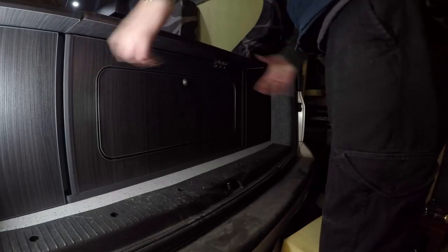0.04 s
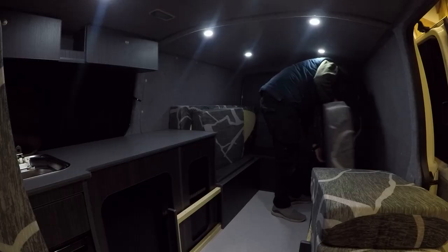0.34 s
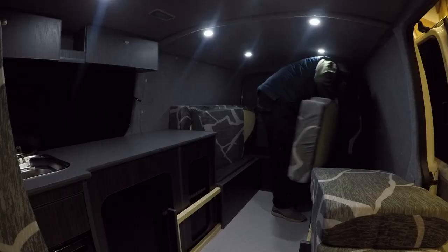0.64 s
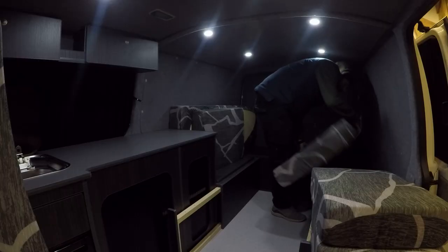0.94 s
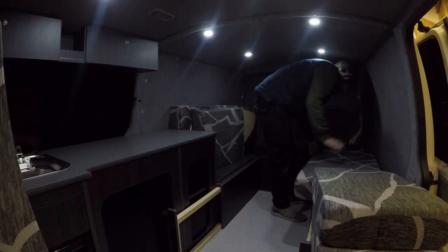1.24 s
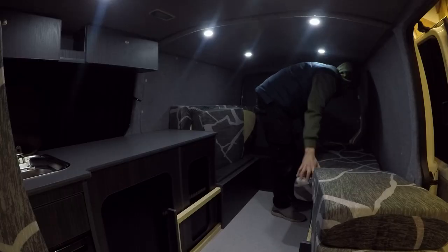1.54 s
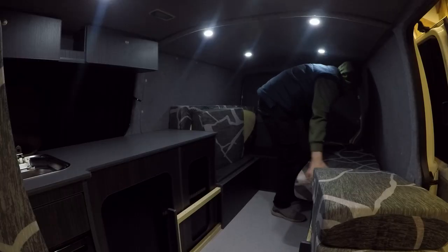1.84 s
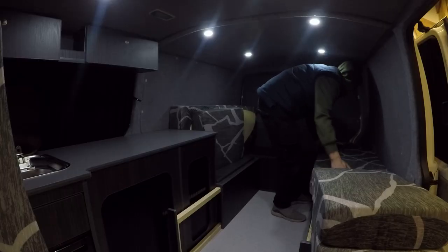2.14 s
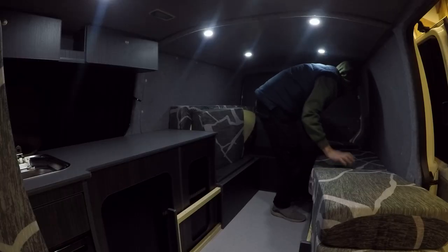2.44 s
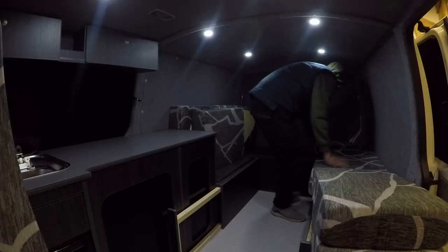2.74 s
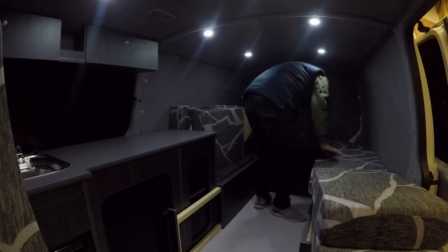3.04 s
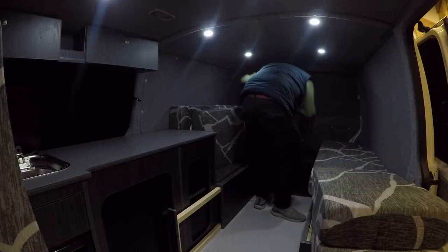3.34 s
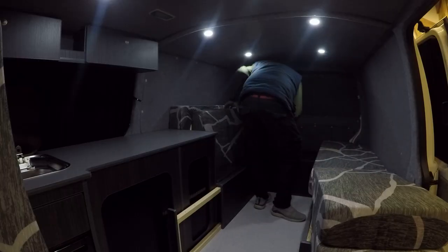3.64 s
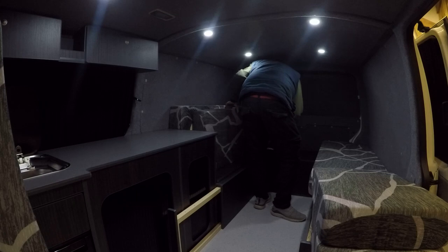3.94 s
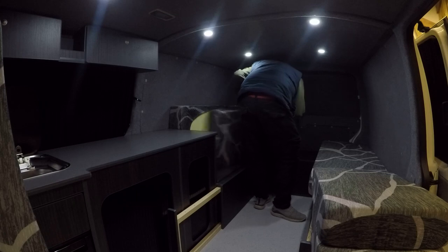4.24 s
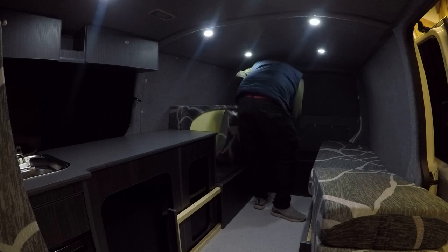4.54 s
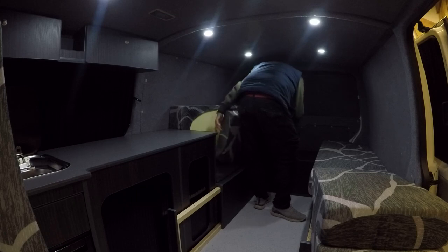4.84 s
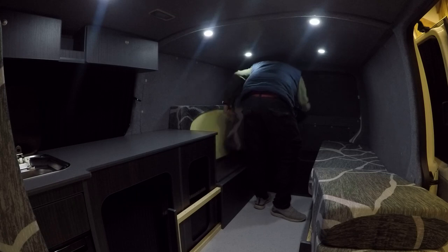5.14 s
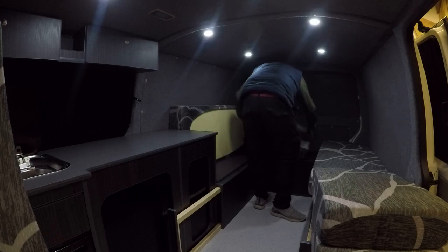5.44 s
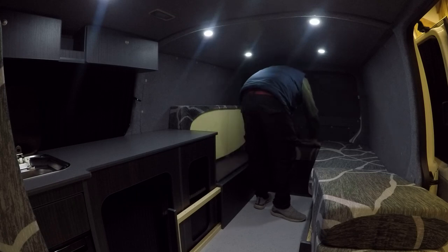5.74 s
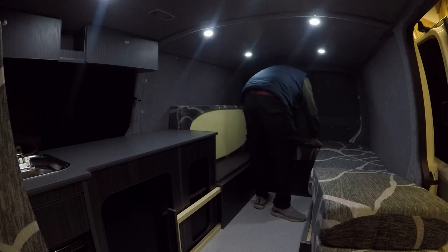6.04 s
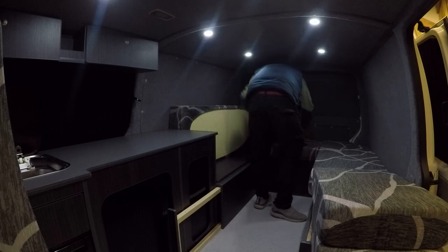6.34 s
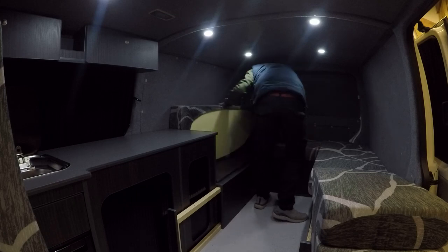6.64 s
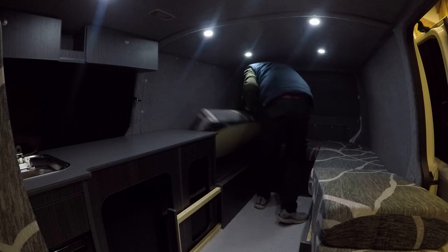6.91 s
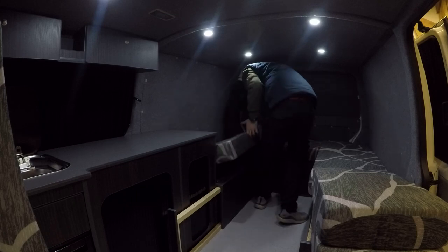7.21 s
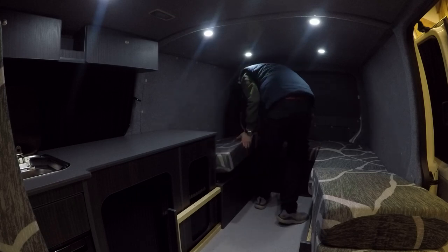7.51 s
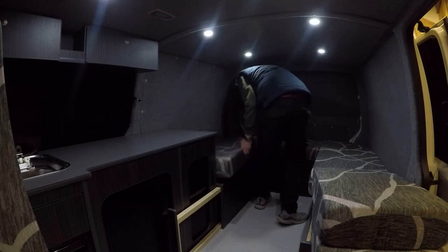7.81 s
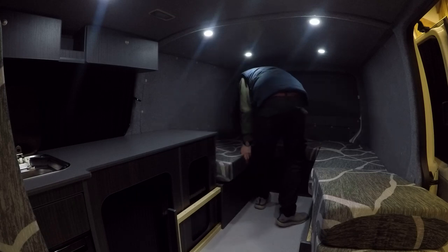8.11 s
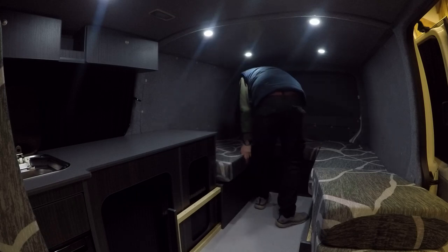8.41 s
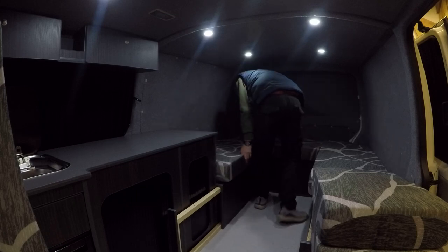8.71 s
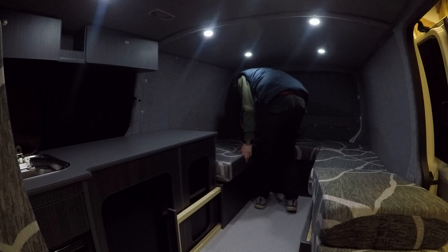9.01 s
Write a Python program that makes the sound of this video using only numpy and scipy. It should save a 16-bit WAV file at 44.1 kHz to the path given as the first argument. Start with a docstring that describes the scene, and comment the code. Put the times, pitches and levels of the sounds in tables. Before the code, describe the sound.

Faint hiss, low rumble and soft shuffling steps fill a carpeted van, heard close through one microphone. At about 1.1 seconds a board-backed foam cushion lands on a plywood bench box: a thump, a quick panel rattle and a cloth slap, after which the van booms and rocks. Pats, nudges and rubbing fabric follow from 2 to 3 seconds, with a light knock near 4.2. At 5.5 seconds comes a heavier drop, with a hollow wooden clack and another fading boom. Covers slide softly from about 6.3 to 8 seconds, one creaking very faintly at 7, and a few low, muffled pushes follow. Near 8.6 seconds a cushion lands on a second box with a higher-pitched knock. Another bump comes at 8.9 and a small tap just after. The cabin's echo is very short.

```python
"""Inside a carpeted van, one microphone close to two plywood bench boxes. Faint hiss, rumble and soft steps.
At 1.1 s a board-backed foam cushion lands: the box thumps, its panels rattle, the cloth cover slaps,
and the van booms and rocks after it. Pats, nudges and rubbing fabric lead to a heavier drop at 5.5 s.
Covers slide, one creaks faintly at 7 s, and near 8.6 s a cushion lands on the higher-pitched left box."""
import sys
import numpy as np
from scipy import signal
from scipy.fft import rfft, irfft, next_fast_len
from scipy.io import wavfile
from scipy.ndimage import map_coordinates

SR = 44100
rng = np.random.default_rng(int(sys.argv[2]) if len(sys.argv) > 2 else 0)


def digitize_waveform(pressure):
    """Quantize a signal to 16-bit integers and store it at the path in sys.argv[1].

    Rows of a 2-D input are taken as channels; values are limited to [-1, 1].
    """
    field = np.atleast_2d(pressure).T
    bounded = np.clip(field, -1, 1)
    quanta = np.round(bounded * 32767).astype(np.int16)
    wavfile.write(sys.argv[1], SR, quanta)


N = 399987

# Spectra of the hiss, the rumble on the springs and rubbing cloth: f/Hz, relative level/dB
HISS_SPECTRUM = [(20, -14), (100, 5.5), (250, 1.5), (600, -3.5), (1500, -8), (4000, -12.5), (6500, -13.5),
                 (10000, -15), (15000, -16.5)]
RUMBLE_SPECTRUM = [(8, 3), (20, 9), (32, 6.5), (50, -9), (80, -18.5), (105, -14.5), (150, -36),
                   (400, -45.5), (1000, -80)]
CLOTH_SPECTRUM = [(150, 4), (450, -3.5), (800, 1), (1500, -2), (2800, -3), (4500, -2.5), (5600, -13.5),
                  (7000, -17), (9500, -14.5), (12500, -24), (15000, -31)]
# Cloth sliding on cloth: t/s of fastest motion, swell time/s, level/dB, treble tilt/(dB per octave)
CLOTH_STROKES = [ (1.003, 0.067, -71, -.5), (2.08, 0.23, -65.5, -3), (2.651, 0.037, -59.5, 2.5),
                 (3.199, 0.44, -74.5, 0), (4.002, 0.18, -77, 2), (4.313, .05, -71, 4), (4.451, .05, -71, 2),
                 (6.288, 0.099, -68, .5), (6.679, 0.16, -60, 0.5), (6.749, .05, -62.5, 2),
                 (6.84, .05, -65.5, 0), (6.978, 0.15, -69.5, .5), (7.446, 0.26, -70, -1),
                 (7.783, 0.071, -65.5, -2.5), (8.093, 0.098, -62, -3)]
# Soft steps, nudges and air pushed by a falling cushion: t/s, thump level/dB, thump f/Hz
SOFT_PUSHES = [ (0.251, -59.5, 97), (0.33, -61.5, 102), (2.06, -43.5, 72.4), (2.077, -36.5, 33),
               (2.248, -46, 46), (2.599, -44.5, 46), (2.785, -47, 96.5), (2.852, -44.5, 55),
               (3.754, -54.5, 63.5), (4.296, -54, 88), (4.365, -45.5, 25), (4.735, -59, 79),
               (4.942, -51.5, 63.4), (5.486, -49.5, 55.3), (5.544, -34.5, 27.8), (5.746, -44.5, 84.3),
               (6.572, -48, 61.5), (7.30, -34, 40), (7.43, -40, 62), (7.564, -41.5, 70), (7.868, -51, 93),
               (8.053, -42.5, 45), (8.425, -46.5, 45), (8.587, -24.5, 31.7), (8.657, -41, 48.3),
               (8.913, -35, 36.3)]
# Modes of the plywood panels: f/Hz, relative level/dB, t60/s
PANEL_MODES = [(159, -1, 0.14), (186.3, 4, 0.12), (227.3, -9, 0.11), (263.8, -7.5, 0.16), (316, -5, 0.083),
               (384, -5, 0.075), (467, -7.5, 0.088), (559, -6.5, 0.082), (710, -4.5, 0.053),
               (850, -7.5, 0.062), (937, -14, 0.057), (1039, -17, 0.084), (1333, -18, 0.088),
               (1492, -11, 0.04), (1990, -30, 0.044), (3225, -16.5, 0.078), (4570, -12, 0.02)]
# Spectrum of the panels' dense ring: f/Hz, relative level/dB
RING_SPECTRUM = [(100, 18.5), (300, 5.5), (600, 5.5), (1300, -10), (2200, -6), (4500, -15.5), (5600, -32),
                 (10000, -35.5), (15000, -48)]
# Decay of that ring: f/Hz, t60/s
RING_DECAY = [(150, 0.11), (500, 0.1), (1500, 0.085), (5000, 0.096), (12000, 0.064)]
# Modes of the van body and the air inside: f/Hz, relative level/dB, t60/s
VAN_MODES = [(29.55, -10, 0.67), (38.7, -13.5, 0.14), (64.8, -32, 0.8), (98.4, -20.5, 0.45),
             (102.7, -32, 0.93)]
# Reverberation of the cabin: f/Hz, t60/s
CABIN_DECAY = [(150, 0.45), (500, 0.4), (2000, 0.31), (8000, 0.24)]
# Blows of cushions, boards and hands; a dropped cushion lands edge first, then flat, then rebounds:
# t/s, thump level/dB, thump f/Hz, hollow knock level/dB, wooden clack level/dB, clack f/Hz,
# cloth slap level/dB, contact time/s
CUSHION_BLOWS = [ (1.123, -34.5, 58.5, -42, -48, 900, -60, 0.013),
                 (1.142, -30, 60.7, -45, -40, 1400, -42, 0.0044),
                 (1.149, -29, 140, -29, -35.5, 1400, -60, 0.0049),
                 (1.173, -32, 65, -31.5, -49, 645, -66, .004),
                 (1.193, -25.5, 102, -37.5, -53, 750, -76, 0.0092),
                 (1.263, -31, 60, -65, -68, 1500, -62.5, 0.0026),
                 (2.127, -32.5, 134, -34.5, -39, 500, -70, 0.0041),
                 (2.477, -41.5, 132, -42, -50.5, 1250, -65, 0.0071),
                 (2.520, -47, 71, -60, -54.5, 1490, -53, .0015),
                 (2.733, -45.5, 120, -45.5, -55, 600, -71, 0.0068),
                 (2.967, -64, 80, -56, -56.5, 840, -71, 0.0015),
                 (3.030, -80, 120, -61.5, -57.5, 790, -54, 0.00059),
                 (4.214, -49.5, 129, -48.5, -45.5, 890, -58, 0.002),
                 (5.517, -34, 56.4, -38.5, -52.5, 910, -66, 0.0085),
                 (5.547, -20.5, 78.5, -27, -39, 1200, -45.5, 0.0014),
                 (5.565, -19, 85.5, -23, -35.5, 1040, -49, 0.0034),
                 (5.579, -33, 96, -30.5, -35.5, 1290, -45.5, 0.002),
                 (5.600, -29.5, 50, -50, -46.5, 790, -61, 0.0039),
                 (8.113, -41, 54.3, -45, -57.5, 1210, -81, 0.0028),
                 (8.579, -22, 77, -40.5, -45, 930, -56.5, 0.0099),
                 (8.604, -25.5, 76.3, -26, -40.5, 1230, -56, 0.0028),
                 (8.624, -38, 107, -34.5, -55, 1010, -52.5, 0.00042),
                 (8.909, -28, 79.5, -36, -46, 1110, -63, 0.0039),
                 (9.05, -50, 61, -49, -58, 920, -67.5, .002)]

TOP_HZ = 15350  # upper limit of the microphone channel
RING_T = np.arange(SR * 3 // 5) / SR  # time axis of one impact, t/s
BURST_SAMPLES = .02 * SR


def amp(db):
    """Decibels to gain."""
    return 10 ** (np.asarray(db) / 20)


def unit(x):
    """Scale to rms 1."""
    return x / np.sqrt(np.mean(x ** 2) + 1e-20)


def burst(x):
    """Scale a short sound to the energy of 20 ms at rms 1."""
    return x / np.sqrt(np.sum(x ** 2) / BURST_SAMPLES + 1e-20)


def along(points, hz):
    """Interpolate (f/Hz, value) points on a log frequency axis."""
    f, values = np.transpose(points)
    return np.interp(np.log(hz + 1), np.log(f + 1), values)


def wobble(knots_per_s):
    """A smooth random curve as long as the scene."""
    knots = rng.standard_normal(int(N * knots_per_s / SR) + 4)
    return map_coordinates(knots, [np.arange(N) * knots_per_s / SR])


def filtered(x, response):
    """Weight the spectrum of x by the gain response(hz)."""
    size = next_fast_len(len(x) + SR // 5)
    return irfft(rfft(x, size) * response(np.fft.rfftfreq(size, 1 / SR)), size)[:len(x)]


def noise(spectrum, size=N):
    """Coloured noise of rms 1."""
    return unit(filtered(rng.standard_normal(size), lambda hz: amp(along(spectrum, hz))))


def band(x, lo_hz, hi_hz, order=3):
    """Causal band-pass, its upper edge at most TOP_HZ."""
    sos = signal.butter(order, [lo_hz, min(hi_hz, TOP_HZ)], "band", fs=SR, output="sos")
    return signal.sosfilt(sos, x)


def dying(x, decays):
    """Fade each frequency of x with its own t60."""
    hz, t, spectra = signal.stft(x, SR, nperseg=128)
    fade = amp(-60 * t / along(decays, hz)[:, None])
    return signal.istft(spectra * fade, SR, nperseg=128)[1][:len(x)]


def add(track, s, sound):
    """Mix a sound into the track at time s."""
    part = track[max(round(s * SR), 0):][:len(sound)]
    part += sound[:len(part)]


def hiss(db=-67):
    """A faint steady hiss at the microphone."""
    return amp(db) * noise(HISS_SPECTRUM)


def sway(blow_push, step_push, rise_s=0.01, fall_db_per_s=33.5, rest_db=-59.5, waver_db=2):
    """Every push rocks the van on its springs, and the rumble settles back to a slight sway."""
    t = np.arange(2 * SR) / SR
    settling = amp(-fall_db_per_s * t) * (1 - np.exp(-t / rise_s))
    load = (amp(-20) * blow_push) ** 2 + (amp(-5.5) * step_push) ** 2  # body weight rocks the van more
    rocking_power = np.abs(signal.fftconvolve(load, settling ** 2)[:N]) / BURST_SAMPLES
    rest_power = amp(rest_db + waver_db * wobble(2.865)) ** 2
    return np.sqrt(rocking_power + rest_power) * noise(RUMBLE_SPECTRUM)


def rubbing(clothes_db=-75, grain_db=1, pivot_hz=2500, stop_share=0.72):
    """Woven covers catch and slip near the microphone: each stroke swells, then stops a little faster."""
    cloth = amp(clothes_db) * noise(CLOTH_SPECTRUM)  # clothing never quite keeps still
    for s, swell_s, db, tilt_db in CLOTH_STROKES:
        t = np.arange(-2 * swell_s, 2 * swell_s, 1 / SR)
        width_s = np.where(t < 0, swell_s, stop_share * swell_s)
        swell = np.exp(-(t / width_s) ** 2)
        colour = [(hz, level + tilt_db * np.log2(hz / pivot_hz)) for hz, level in CLOTH_SPECTRUM]
        add(cloth, s + t[0], amp(db) * swell * noise(colour, size=len(t)))
    grain = unit(amp(grain_db * wobble(300)))
    return cloth * grain


def thump(hz, t60_cycles=4, rise_cycles=0.61):
    """A bench or floor board gives under a load and swings back, damped at once by the foam."""
    cycles = hz * RING_T
    envelope = (1 - np.exp(-cycles / rise_cycles)) * amp(-60 * cycles / t60_cycles)
    return burst(np.sin(2 * np.pi * cycles) * envelope)


def panel_ring(contact_s, modes_db=-5, scatter_db=2):
    """Plywood modes and a dense ring build up while the surfaces close on each other."""
    hz, db, t60 = np.transpose(PANEL_MODES)[:, :, None]
    struck_db = db + scatter_db * rng.standard_normal(hz.shape)
    phase = rng.uniform(0, 2 * np.pi, hz.shape)
    envelopes = amp(struck_db - 60 * RING_T / t60)
    modes = np.sum(envelopes * np.sin(2 * np.pi * hz * RING_T + phase), axis=0)
    dense = dying(noise(RING_SPECTRUM, size=len(RING_T)), RING_DECAY)
    closing = (1 - np.exp(-RING_T / contact_s)) ** 1.38
    first_wave = 1 + 1.06 * np.exp(-RING_T / 0.0048)  # the first wave is the strongest
    return (amp(modes_db) * burst(modes) + burst(dense)) * closing * first_wave


def shuffles(count=12, db=-62, spread_db=3, hz=85, spread_octaves=.25):
    """Feet shift faintly on the floor at random moments: rows of t/s, level/dB, f/Hz."""
    times = (np.arange(count) + rng.random(count)) * N / SR / count
    strength, pitch = rng.standard_normal((count, 2)).T
    return list(zip(times, db + spread_db * strength, hz * 2 ** (spread_octaves * pitch)))


def steps(knock_offset_db=-18, pivot_hz=60, db_per_octave=11.5):
    """Soft soles and foam press slowly: a low push, and only the lowest panel modes answer."""
    push, wood = np.zeros(N), np.zeros(N)
    for s, thump_db, thump_hz in SOFT_PUSHES + shuffles():
        add(push, s, amp(thump_db) * thump(thump_hz, t60_cycles=6.9))
        # quicker presses knock more
        knock_db = thump_db + knock_offset_db + db_per_octave * np.log2(thump_hz / pivot_hz)
        knock = burst(band(panel_ring(contact_s=0.0064), 81, 242, order=2))
        add(wood, s, amp(knock_db) * knock)
    return push, wood


def van_boom(push, coupling=4.73):
    """A push, then the body shell and the enclosed air ringing on around the microphone."""
    t = np.arange(2 * SR) / SR
    shell = sum(amp(db - 60 * t / t60) * hz * np.cos(2 * np.pi * hz * t) for hz, db, t60 in VAN_MODES)
    return push + signal.fftconvolve(push, coupling * shell / SR)[:N]


def cabin(direct, wet_db=-19, build_s=0.0021):
    """At close range the direct sound stands well above the short tail of the carpet-lined cabin."""
    tail = dying(rng.standard_normal(len(RING_T)), CABIN_DECAY) * (1 - np.exp(-RING_T / build_s))
    return direct + amp(wet_db) * signal.fftconvolve(direct, tail / np.linalg.norm(tail))[:N]


def clack(ring, hz, focus_db=4):
    """The spot that is struck favours one group of panel modes."""
    broad = burst(band(ring, 300, 1570))
    favoured = burst(band(ring, hz / 1.26, hz * 1.19, order=1))
    return burst(broad + amp(focus_db) * favoured)


def blows(right_box_hz=197, left_box_hz=258, left_from_s=7.0, band_ratio=1.512):
    """Cushions land and hands pat, right bench then left: a low push, and knock, clack and cloth slap."""
    push, rattle = np.zeros(N), np.zeros(N)
    for s, thump_db, thump_hz, knock_db, clack_db, clack_hz, slap_db, contact_s in CUSHION_BLOWS:
        ring = panel_ring(contact_s)
        box_hz = right_box_hz if s < left_from_s else left_box_hz
        hollow_knock = burst(band(ring, box_hz / band_ratio, box_hz * band_ratio))
        cloth_slap = burst(band(ring, 2600, TOP_HZ))
        add(push, s, amp(thump_db) * thump(thump_hz))
        add(rattle, s - .002, amp(knock_db) * hollow_knock)
        add(rattle, s, amp(clack_db) * clack(ring, clack_hz))
        add(rattle, s, amp(slap_db) * cloth_slap)
    return push, rattle


def creak(s=7.01, swell_s=0.028, hz=2500, db=-68):
    """The cover creaks faintly as a cushion tips over its edge."""
    swell = np.exp(-((np.arange(N) / SR - s) / swell_s) ** 2)
    narrow_noise = unit(band(rng.standard_normal(N), hz / 1.05, hz * 1.05, order=1))
    return amp(db) * swell * narrow_noise


def scene():
    """Everything that reaches one microphone position inside the van."""
    blow_push, blow_rattle = blows()
    step_push, step_wood = steps()
    van = van_boom(blow_push + step_push) + sway(blow_push, step_push)
    panels = cabin(blow_rattle + step_wood)
    return (van + panels + rubbing() + creak() + hiss())[None]


def record(dry):
    """The mono microphone channel keeps nothing above its band limit."""
    return filtered(dry[0], lambda hz: hz < TOP_HZ)[None]


dry = scene()
out = record(dry)
digitize_waveform(out)
```